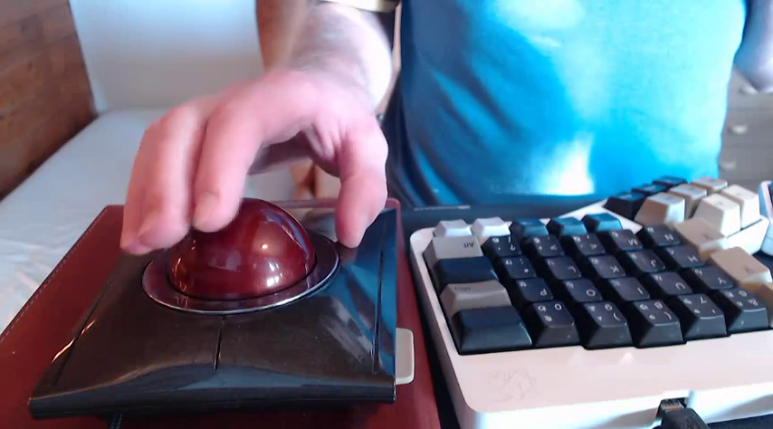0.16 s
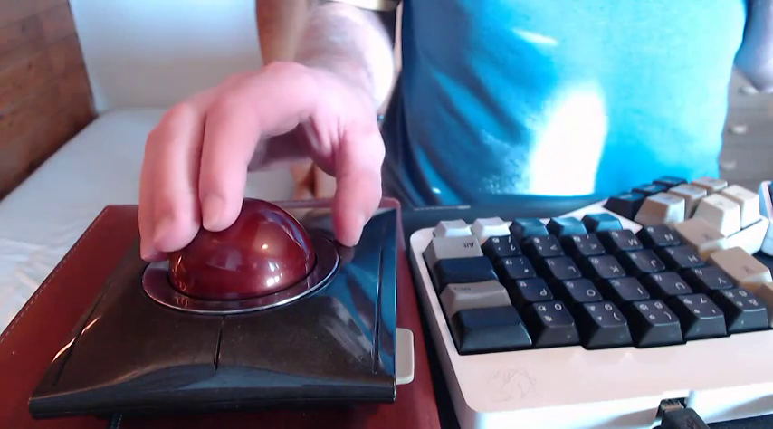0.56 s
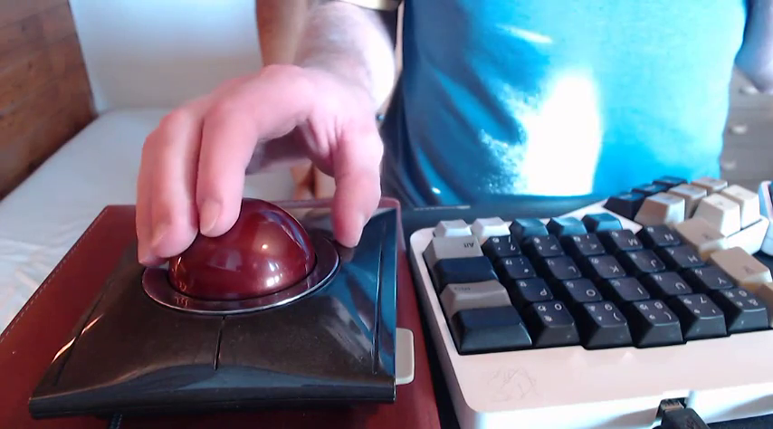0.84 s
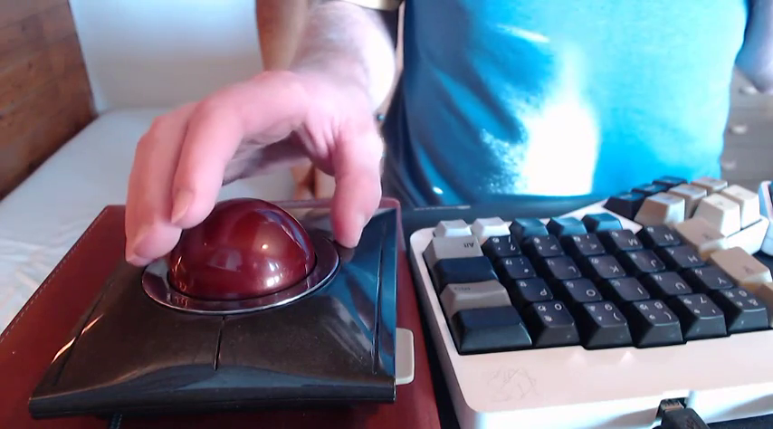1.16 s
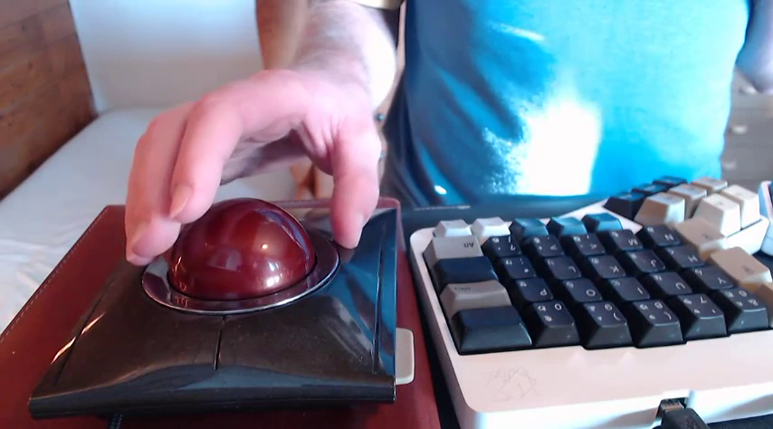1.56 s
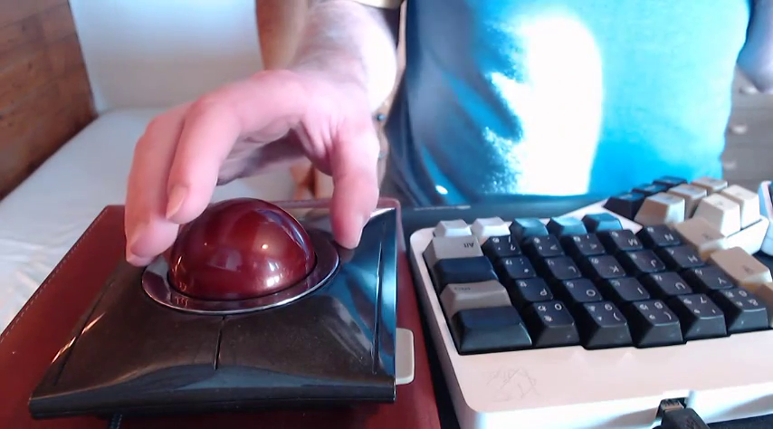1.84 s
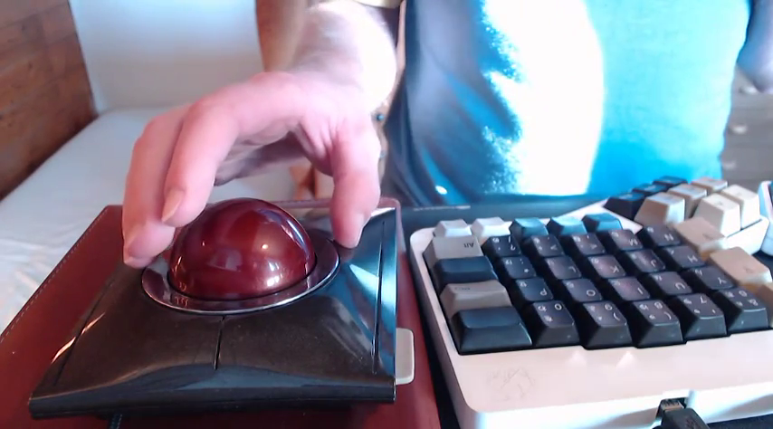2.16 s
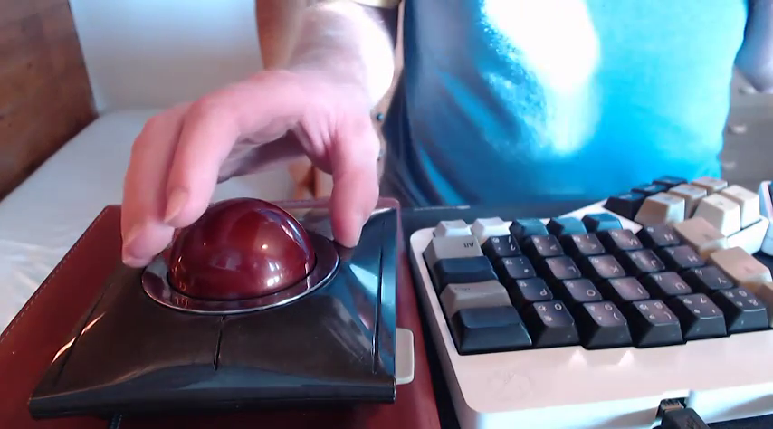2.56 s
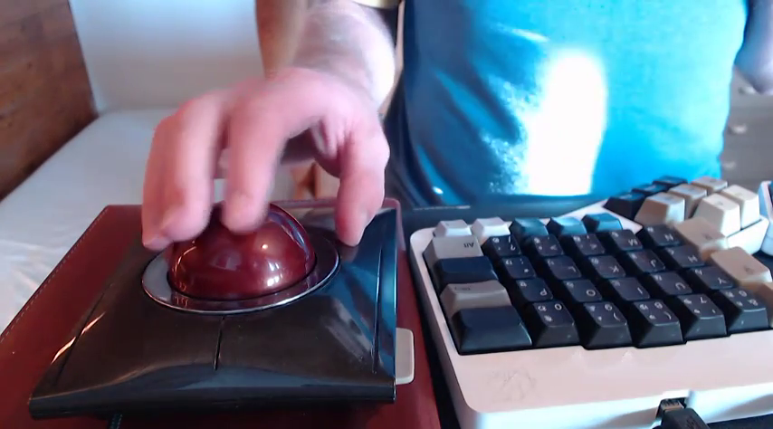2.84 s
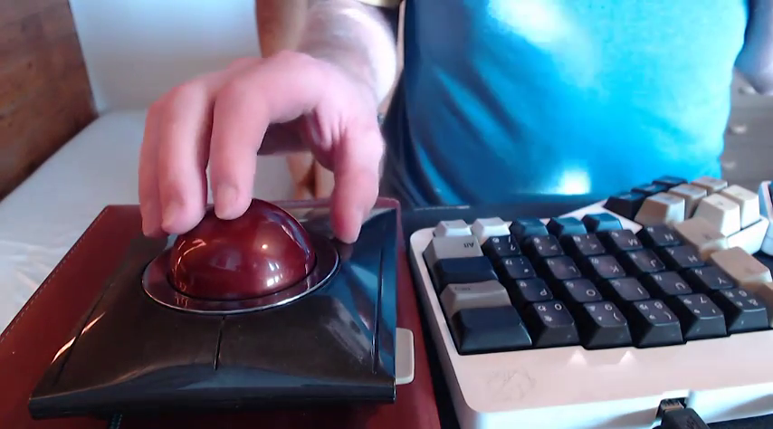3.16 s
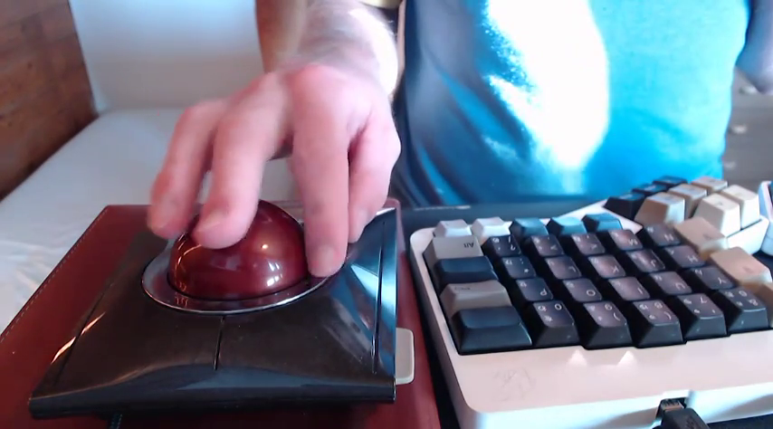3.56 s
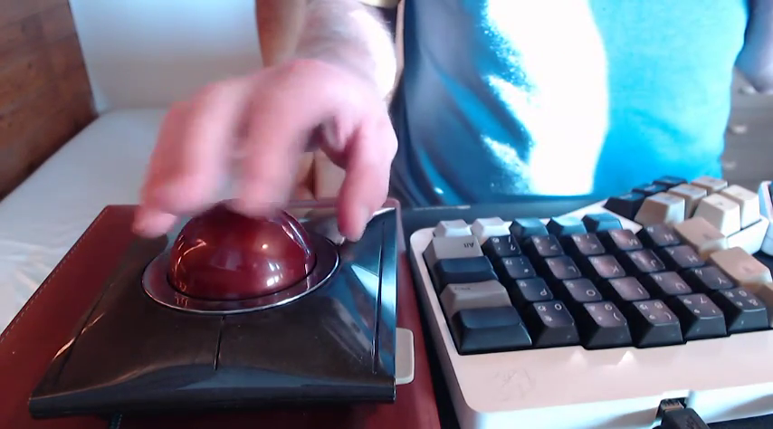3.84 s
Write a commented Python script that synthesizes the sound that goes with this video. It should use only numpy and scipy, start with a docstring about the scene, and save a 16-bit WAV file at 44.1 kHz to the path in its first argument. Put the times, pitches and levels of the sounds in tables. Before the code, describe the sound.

Trackball button clicked seven times, sharp double snaps, with soft ball knocks and rubbing, over faint hum

```python
"""A trackball on a desk in a small room, over rumble, hiss, mains hum and faint electrical pips; four seconds.
The level starts in a brief dip. Then the ball knocks in its socket, the hand bumps the desk and fingers roll the ball.
From 0.9 s to 2.4 s the button is pressed and released seven times, ringing microswitch, plastic shell and desk.
After that come more knocks and bumps and a second roll; near 3.8 s the level dips again and a last roll begins.
Rings are damped sines; rubbing, scuffs and hiss are coloured noise; reflections and a short tail make the room."""
import sys
import numpy as np
from scipy import signal
from scipy.fft import rfft, irfft, next_fast_len
from scipy.io import wavfile
from scipy.ndimage import uniform_filter1d, map_coordinates

SR = 44100
rng = np.random.default_rng(int(sys.argv[2]) if len(sys.argv) > 2 else 0)


def to_wav(s):
    """Save 16-bit WAV."""
    ch = np.atleast_2d(s).T  # columns
    pcm = np.round(np.clip(ch, -1, 1) * 32767)  # PCM
    wavfile.write(sys.argv[1], SR, pcm.astype(np.int16))


N = 176400
TIME = np.arange(N) / SR
RING = TIME[:SR // 3]  # time axis of one struck sound

# Background bed. Each row: frequency in Hz, relative density in dB per Hz.
FLOOR_COLOUR = [(25, -3), (45, -3.5), (85, -5.5), (110, -7), (145, -3), (190, -1), (225, -4.5), (260, -6),
                (350, -15), (600, -17), (880, -21), (1200, -20.5), (1800, -20.5), (2600, -26),
                (3800, -31.5), (6000, -31), (9500, -27.5), (11000, -37), (13000, -40.5)]
# Stereo width of the bed. Each row: frequency in Hz, left-right likeness from 0 to 1.
FLOOR_ALIKE = [(60, 0.77), (180, 0.92), (520, 0.25), (1550, 0.78), (4590, 0.47), (13600, 0.28)]
# Steady hum and whine. Each row: frequency in Hz, rms level in dB.
HUM_TONES = [(60, -73.5), (120, -68), (197, -66.5), (1200, -79.5), (1800, -76.5), (9841, -85.5)]
# Electrical interference. Each row: frequency in Hz, time of a first pip in seconds, peak level in dB.
PIPS = [(4493, 0.0186, -66), (9120, 0.0185, -64.5), (8005, 0.0243, -65)]
FLOOR_DB = -58.5
PIPS_PER_S, PIP_WIDTH_S = 24, 0.0032

# The hand bumps the desk. Each row: start in seconds, peak level in dB, frequency in Hz, length in seconds.
BUMPS = [(0.195, -51, 62.7, 0.1), (2.741, -51.5, 56, 0.11), (3.405, -44.5, 57, 0.093),
         (3.882, -37, 59.7, 0.089)]

# Rubbing of the rolling ball, one list per gesture. Each row: time in seconds, relative level in dB.
ROLL_GESTURES = [
    [(0.2, -95), (0.228, -82), (0.234, -82.5), (0.312, -58.5), (0.464, -81.5), (0.474, -69), (0.508, -79),
     (0.516, -84), (0.55, -95)],
    [(2.85, -77), (2.876, -80), (2.924, -66.5), (3.076, -78), (3.152, -56), (3.214, -68.5), (3.306, -59.5),
     (3.382, -60), (3.55, -88)],
    [(3.85, -92), (3.864, -78), (3.872, -86), (3.886, -89), (3.892, -77), (3.922, -68), (3.926, -66.5),
     (3.978, -59), (4.0, -60)],
]
# Colour of rubbing and scuffs. Each row: frequency in Hz, relative level in dB.
RUB_COLOUR = [(150, -5), (230, -1.5), (270, 7.5), (335, -14), (410, 9), (490, -11.5), (570, -2), (680, -2),
              (800, -7.5), (1500, -12), (3300, -25.5), (5700, -21), (8000, -27), (13000, -57)]
ROLL_DB = 7  # raises every gesture
GRAINS_PER_S, GRAIN_SHARE = 250, 0.37
GRIP_DB, GRIP_PER_S = 3, 60  # the grip of the fingers wavers: depth and rate

# The ball knocks in its socket. Each row: start in seconds, level in dB before the bass cut, pitch in Hz,
# lift of overtones and scuff in dB.
KNOCKS = [(.161, -45.5, 554, -1), (.428, -49, 492, -15), (1.234, -42.5, 497, -10), (2.251, -41.5, 538, -7),
          (2.509, -41, 571, 2.5), (2.543, -44.5, 563, -1.5), (2.606, -53, 530, -5),
          (2.938, -45.5, 553, -17), (3.148, -39.5, 489, 0), (3.266, -43, 572, -10), (3.3, -44.5, 414, -10),
          (3.411, -42.5, 411, -10), (3.692, -30.5, 599, 2.5)]
# Modes of the ball in its socket. Each row: ratio to the pitch, t60 in seconds, relative level in dB.
BALL_MODES = [(1, 0.069, 1.5), (.88, 0.044, -11.5), (1.27, 0.078, -12.5), (1.5, 0.042, -13.5),
              (1.7, 0.019, -1.5), (1.92, 0.0095, -15), (2.6, 0.048, -16.5), (3.3, 0.018, -16),
              (4.2, 0.014, -15)]
KNOCK_RISE_S, SCUFF_DB, SCUFF_T60_S = 0.0011, -16.5, 0.033

# Button strokes. Each row: press in seconds, release in seconds.
STROKES = [(0.8993, 1.0025), (1.0983, 1.1731), (1.4529, 1.564), (1.6877, 1.7751), (1.891, 2.0021),
           (2.0849, 2.1996), (2.2943, 2.4207)]
# Plastic shell. Each row: frequency in Hz, t60 in seconds, typical dB on press and dB on release before the bass cut.
SHELL_MODES = [(454, 0.01, -52, -46), (535, 0.022, -17.5, -16.5), (660, 0.029, -30, -25.5),
               (753, 0.015, -29.5, -26), (1021, 0.065, -44, -51.5), (1307, 0.033, -37, -37),
               (1463, 0.058, -40.5, -40.5), (1659, 0.03, -34.5, -33.5), (1875, .026, -38, -37),
               (2216, 0.017, -40.5, -38.5), (2543, 0.021, -37, -37), (2855, .011, -32.5, -28)]
# Microswitch spring. Each row: frequency in Hz, t60 in seconds, typical dB on press, typical dB on release.
SWITCH_MODES = [(3930, 0.014, -39, -41), (4583, 0.008, -30, -25.5), (4780, 0.0085, -39, -31),
                (5930, 0.015, -40.5, -36), (6776, 0.0082, -25.5, -19.5), (7335, 0.0075, -27.5, -27.5),
                (8450, 0.0045, -38, -39.5), (10200, .0013, -12.5, -14.5)]
# Long ring of the desk and what stands on it. Each row: frequency in Hz, t60 in seconds, level in dB before the bass cut.
DESK_MODES = [(406.7, 0.31, -49.5), (512.4, 0.52, -57), (589, 0.05, -34), (646.4, 0.2, -46),
              (865.5, 0.19, -48), (1303, 0.084, -58.5)]
# Contact noise of the snap. Each row: frequency in Hz, relative level in dB.
CRACK_COLOUR = [(1000, -22), (2800, 6.5), (3400, -2.5), (4700, -7), (5500, -22.5), (7200, -5),
                (9000, -10.5), (13000, -21)]
# Scrape of the bending spring. Each row: frequency in Hz, relative level in dB.
FLEX_COLOUR = [(1500, -21), (4500, -4), (6700, -6), (9000, -10), (13000, -28)]
SHELL_CUT_HZ = 393  # the small housing radiates little below this
SHELL_RISE_S, SWITCH_RISE_S = 0.0024, 0.0011
STROKE_SPREAD_DB = 0.58  # random level spread of each shell and switch mode
PRESS_CRACK_DB, RELEASE_CRACK_DB, CRACK_T60_S = -39, -42, 0.02
FLEX_DB, FLEX_LEAD_S, FLEX_WIDTH_S = -44, 0.0011, 0.00074

# Near reflections of the treble. Each row: delay in seconds, level in dB.
NEAR_WALLS = [(.0031, -32.5), (.0052, -15), (.0084, -44.5)]
# Late reflections of the low knock. Each row: delay in seconds, level in dB.
FAR_WALLS = [(.035, -25), (.0495, -27.5), (.061, -28.5), (.069, -35)]
# Decay of the room tail. Each row: frequency in Hz, t60 in seconds.
ROOM_T60 = [(300, 0.1), (1200, 0.13), (5000, 0.28), (11000, 0.2)]
# Level of the room tail. Each row: frequency in Hz, level in dB.
ROOM_SEND = [(300, -27), (520, -17), (900, -5.5), (1600, -10), (3000, -16.5), (4700, -14.5), (5600, -8.5),
             (6800, -19), (8000, -11), (11000, -22)]
# Stereo width of the room tail. Each row: frequency in Hz, left-right likeness from 0 to 1.
ROOM_ALIKE = [(500, .95), (2000, 0.38), (6000, 0.76)]
ROOM_DELAY_S = 0.0061

# Level tilt to the left. Each row: frequency in Hz, left over right in dB.
LEFT_LOUDER = [(100, 1), (500, 3.1), (1000, 2.3), (1700, .5), (2800, 4), (3800, 3), (4600, 5), (5100, 1),
               (6700, 5.5), (7600, 2), (10000, 3)]
# Phase lead of the left. Each row: frequency in Hz, left ahead of right in radians.
LEFT_LEADS = [(500, .26), (1200, .07), (1900, .08), (2600, .8), (3100, .2), (4500, .3), (5050, 1.5),
              (5800, .8), (6800, .45), (8000, 0)]
# Spans where the level dips. Each row: start in seconds, end in seconds.
DIPS = [(0, .047), (3.766, 3.789)]
DIP_DB, TOP_HZ = -24, 13200


def amp(db):
    """Decibels to gain."""
    return 10 ** (np.asarray(db) / 20)


def unit(x):
    """Scale to rms 1."""
    return x / np.sqrt(np.mean(x ** 2) + 1e-20)


def along(points, hz):
    """Read (Hz, value) points on a log frequency axis."""
    f, v = np.transpose(points)
    return np.interp(np.log(hz + 1), np.log(f + 1), v)


def filtered(x, response):
    """Shape x by a complex response of frequency."""
    n = x.shape[-1]
    padded = next_fast_len(n + SR // 4)
    hz = np.fft.rfftfreq(padded, 1 / SR)
    return irfft(rfft(x, padded) * response(hz), padded)[..., :n]


def coloured(x, spectrum):
    """Shape x by (Hz, dB) points, at rms 1."""
    return unit(filtered(x, lambda hz: amp(along(spectrum, hz))))


def noise(spectrum, t):
    """Coloured noise as long as t."""
    return coloured(rng.standard_normal(len(t)), spectrum)


def spread(pair, alike):
    """Blend two unrelated signals into left and right of a given likeness."""
    def mid_side(hz):
        turn = np.arccos(np.clip(along(alike, hz), 0, 1)) / 2
        return np.array([np.cos(turn), np.sin(turn)])

    mid, side = filtered(pair, mid_side)
    return np.array([mid + side, mid - side])


def fade(t60):
    """Exponential decay, 60 dB down after t60 seconds."""
    return np.exp(-np.log(1000) * RING / t60)


def swell_in(rise_s):
    """Smooth build-up from silence to full level over rise_s."""
    return np.sin(np.pi / 2 * np.minimum(RING / rise_s, 1)) ** 2


def ring(modes, rise_s):
    """Damped (Hz, t60, dB) modes that build up over rise_s."""
    tones = sum(amp(db) * fade(t60) * np.sin(2 * np.pi * hz * RING) for hz, t60, db in modes)
    return swell_in(rise_s) * tones


def add(track, s, sound):
    """Mix a sound in at time s."""
    part = track[max(round(s * SR), 0):][:len(sound)]
    part += sound[:len(part)]


def radiate(x):
    """The small housing sheds its bass."""
    return signal.sosfilt(signal.butter(6, SHELL_CUT_HZ, "highpass", fs=SR, output="sos"), x)


def electrical_pips():
    """Short tone bursts at a fixed rate, each with a starting phase of its own."""
    out = np.zeros(N)
    for hz, first_s, db in PIPS:
        beat = (TIME - first_s) * PIPS_PER_S
        from_pip_s = ((beat + 0.5) % 1 - 0.5) / PIPS_PER_S
        gate = np.exp(-(from_pip_s / PIP_WIDTH_S) ** 2)
        phases = rng.random(int(N / SR * PIPS_PER_S) + 3)
        phase = phases[np.round(beat).astype(int) + 1]
        out += amp(db) * gate * np.sin(2 * np.pi * (hz * TIME + phase))
    return out


def background():
    """Rumble and hiss as wide coloured noise, under steady hum and electrical pips."""
    air = spread(np.array([noise(FLOOR_COLOUR, TIME), noise(FLOOR_COLOUR, TIME)]), FLOOR_ALIKE)
    hum = np.zeros(N)
    for hz, db in HUM_TONES:
        hum += np.sqrt(2) * amp(db) * np.sin(2 * np.pi * (hz * TIME + rng.random()))
    return amp(FLOOR_DB) * air + hum + electrical_pips()


def desk_bumps():
    """The weight of the hand rocks the desk for a few slow cycles."""
    out = np.zeros(N)
    for s, db, hz, length in BUMPS:
        hump = np.sin(np.pi * np.minimum(RING / length, 1)) ** 2
        add(out, s, amp(db) * hump * np.sin(2 * np.pi * hz * RING))
    return out


def ball_rolling():
    """Fine friction grains sound through the housing while the fingers turn the ball with an uneven grip."""
    level = np.zeros(N)
    for gesture in ROLL_GESTURES:
        level += amp(np.interp(TIME, *np.transpose(gesture), left=-120, right=-120))
    grains = unit((rng.random(N) < GRAINS_PER_S / SR) * rng.uniform(-0.97, 1, N))
    rub = coloured(GRAIN_SHARE * grains + rng.standard_normal(N) / 2, RUB_COLOUR)
    # random values joined by a smooth curve
    grip = map_coordinates(rng.standard_normal(size=1024), [TIME * GRIP_PER_S], mode="wrap")
    return amp(ROLL_DB + GRIP_DB * grip) * level * rub


def ball_knocks():
    """The ball settles on its bearings with a hollow knock and a short scuff."""
    out = np.zeros(N)
    for s, db, hz, bright_db in KNOCKS:
        lift = [0] + [bright_db] * (len(BALL_MODES) - 1)  # the first mode stays put
        modes = [(hz * ratio, t60, level + up) for (ratio, t60, level), up in zip(BALL_MODES, lift)]
        scuff = amp(SCUFF_DB + bright_db) * fade(SCUFF_T60_S) * noise(RUB_COLOUR, RING)
        add(out, s, amp(db) * radiate(ring(modes, KNOCK_RISE_S) + scuff))
    return out


def thrown(modes, released):
    """Pick press or release levels, each a little different every time."""
    return [(hz, t60, (up_db if released else down_db) + rng.normal(0, STROKE_SPREAD_DB))
            for hz, t60, down_db, up_db in modes]


def snap(released):
    """One throw of the switch rings spring, shell and desk; the release kicks the body the other way."""
    body = radiate(ring(thrown(SHELL_MODES, released), SHELL_RISE_S) + ring(DESK_MODES, SHELL_RISE_S))
    spring = ring(thrown(SWITCH_MODES, released), SWITCH_RISE_S)
    crack_db = RELEASE_CRACK_DB if released else PRESS_CRACK_DB
    crack = amp(crack_db) * fade(CRACK_T60_S) * noise(CRACK_COLOUR, RING)
    return (-1 if released else 1) * body + spring + crack


def spring_flex():
    """The spring bends just before it snaps: a tiny scrape that peaks two widths in."""
    swell = np.exp(-(RING / FLEX_WIDTH_S - 2) ** 2 / 2)
    return amp(FLEX_DB) * swell * noise(FLEX_COLOUR, RING)


def button():
    """Every stroke snaps twice, each time just after the scrape of the bending spring."""
    out = np.zeros(N)
    for stroke in STROKES:
        for released, s in enumerate(stroke):
            add(out, s - FLEX_LEAD_S - 2 * FLEX_WIDTH_S, spring_flex())
            add(out, s, snap(released))
    return out


def echoes(table, hz):
    """Frequency response of a set of delayed copies."""
    return sum(amp(db) * np.exp(-2j * np.pi * hz * s) for s, db in table)


def walls(x, near_hz, far_hz):
    """Close surfaces throw back the treble at once; the low knock returns later from the walls."""
    def response(hz):
        treble = hz ** 2 / (hz ** 2 + near_hz ** 2)
        bass = np.exp(-(hz / far_hz) ** 2)
        return echoes(NEAR_WALLS, hz) * treble + echoes(FAR_WALLS, hz) * bass

    return filtered(x, response)


def room(x):
    """Nothing moves, so one short tail of decaying noise answers every sound."""
    hz, t, grid = signal.stft(rng.standard_normal((2, SR // 2)), SR, nperseg=256)
    decay = np.exp(-np.log(1000) * t / along(ROOM_T60, hz)[:, None])
    energy = np.mean(decay ** 2, axis=1, keepdims=True) * (SR // 2)
    decay *= amp(along(ROOM_SEND, hz))[:, None] / np.sqrt(energy)  # level set apart from decay time
    tail = spread(signal.istft(grid * decay, SR, nperseg=256)[1], ROOM_ALIKE)
    delayed = np.pad(x, (round(ROOM_DELAY_S * SR), 0))
    return signal.fftconvolve(delayed[None], tail, axes=1)[:, :N]


def scene():
    """The trackball stands a little left of a pair of microphone ports."""
    dry = button() + ball_knocks() + ball_rolling()
    sides = np.array([[0.5], [-0.5]])  # left and right each take half the difference
    near = dry + walls(dry, near_hz=1200, far_hz=1520)
    direct = filtered(near, lambda hz: np.exp(1j * sides * along(LEFT_LEADS, hz)))
    trackball = filtered(direct + room(dry), lambda hz: amp(sides * along(LEFT_LOUDER, hz)))
    return trackball + desk_bumps() + background()


def record(dry):
    """The level dips briefly in each span, with softened edges, and nothing passes above the band limit."""
    dipped = sum(1. * ((TIME >= start) & (TIME < end)) for start, end in DIPS)
    gain = amp(DIP_DB * uniform_filter1d(dipped, size=40))
    return filtered(dry * gain, lambda hz: hz < TOP_HZ)


dry = scene()
out = record(dry)
to_wav(out)
```